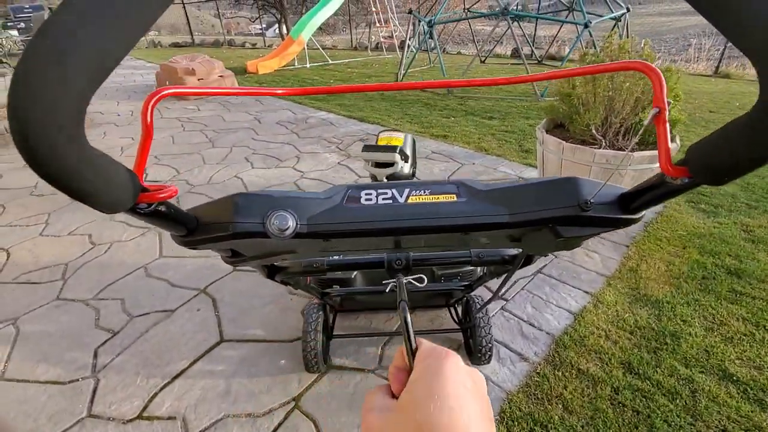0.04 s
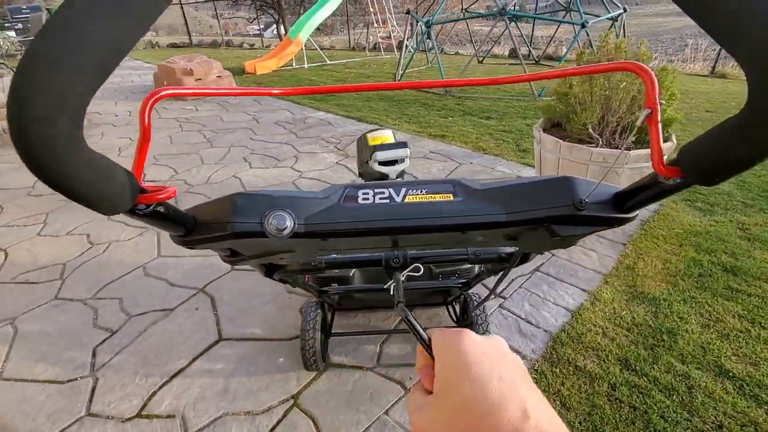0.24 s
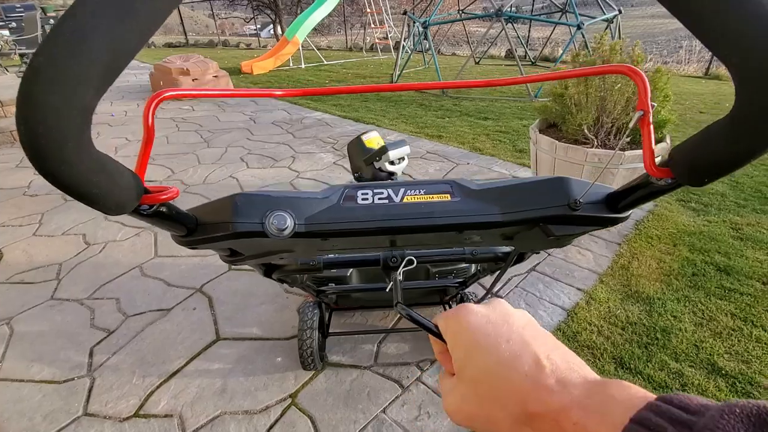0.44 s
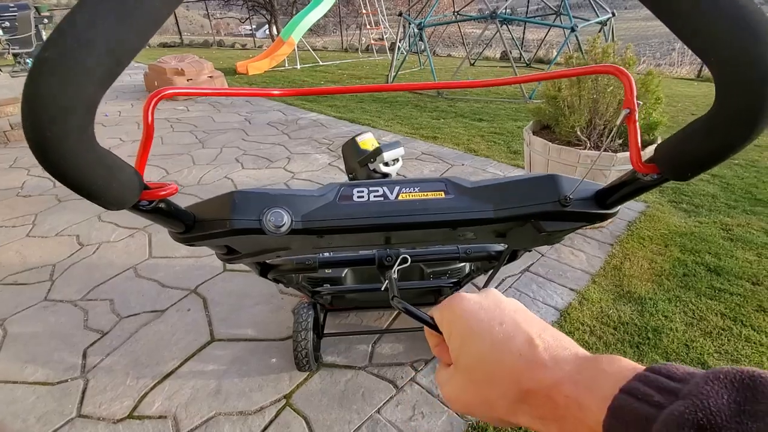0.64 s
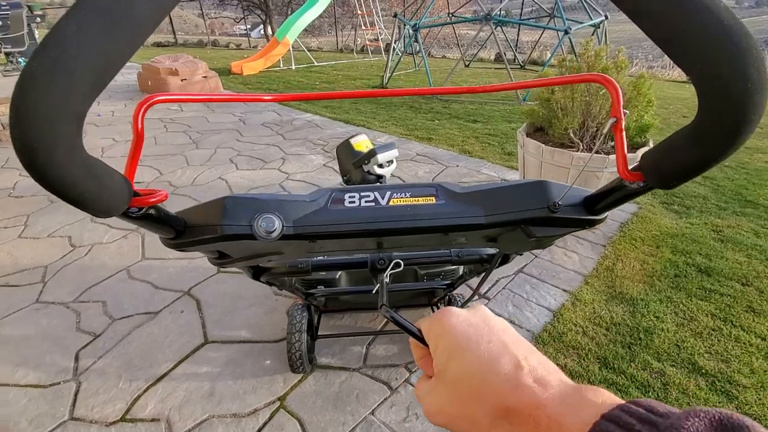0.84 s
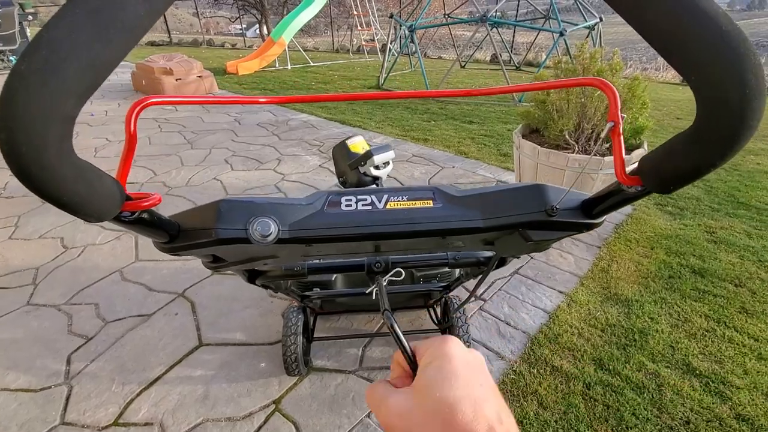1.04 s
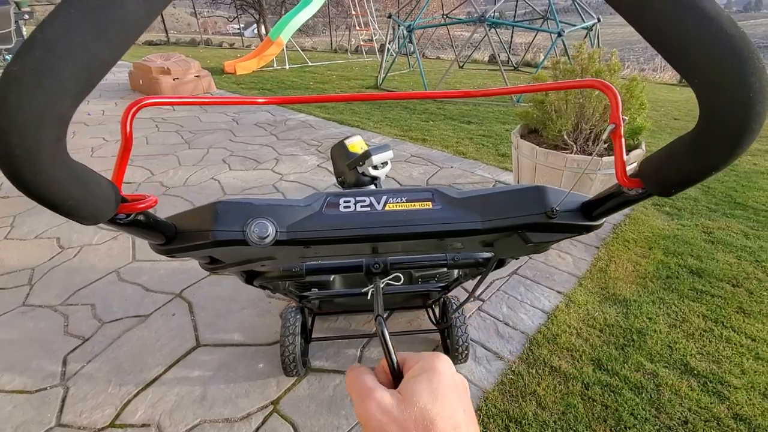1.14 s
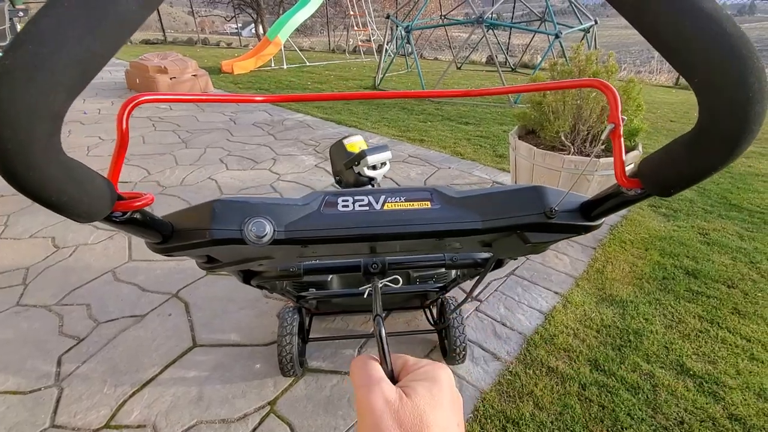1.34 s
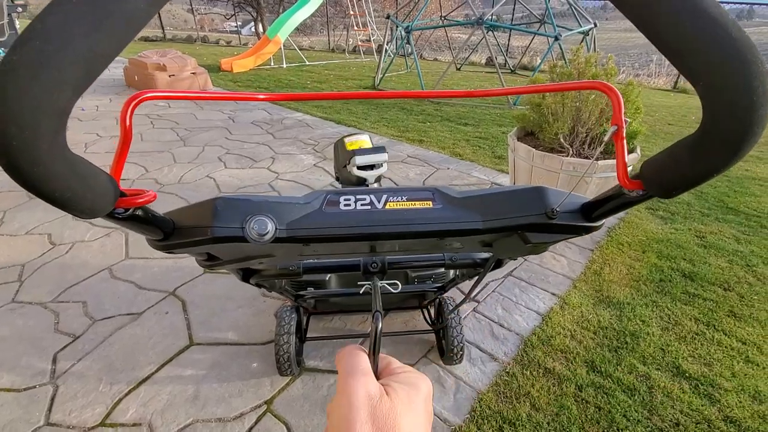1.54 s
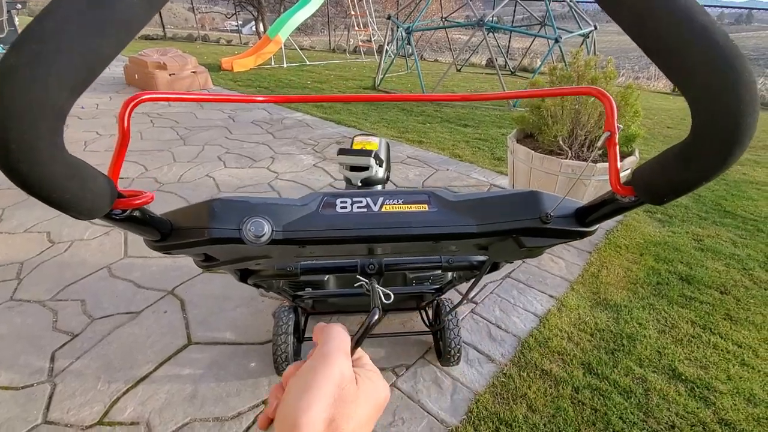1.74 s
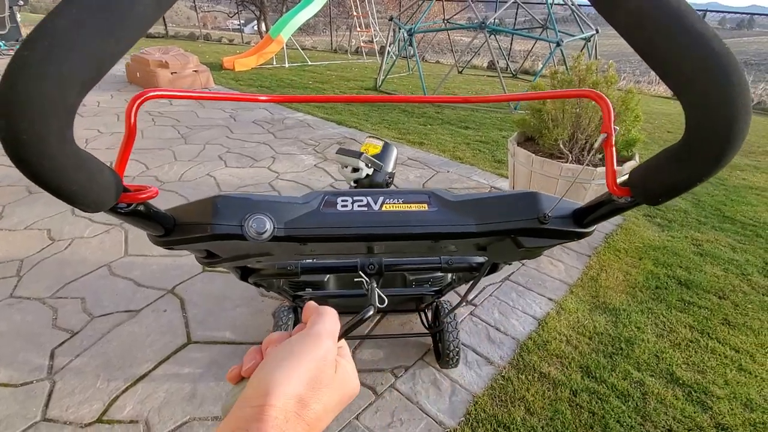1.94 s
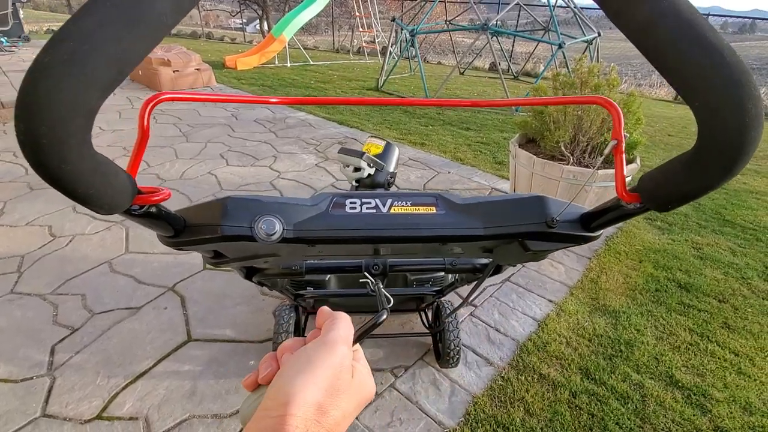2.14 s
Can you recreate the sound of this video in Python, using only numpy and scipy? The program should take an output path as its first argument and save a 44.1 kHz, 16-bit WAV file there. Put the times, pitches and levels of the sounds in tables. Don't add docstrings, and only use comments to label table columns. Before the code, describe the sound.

A snowblower chute crank turns close by, slightly left. Faint creaks and a light touch open; hard, hollow metal clunks with rasping gear teeth hit at 0.2-0.27 and 0.4-0.46 s. Soft, dull knocks follow, growing from 0.86 to 1.3 s. After a lull, rattling clunks and scrapes cluster at 1.52-1.87 s, then fade. Short patio echoes, low wind, faint insect hiss, a barely audible far bird after 2.05 s.

```python
import sys
import numpy as np
from scipy import signal
from scipy.fft import rfft, irfft
from scipy.io import wavfile
from scipy.ndimage import uniform_filter1d

SR = 44100
rng = np.random.default_rng(int(sys.argv[2]) if len(sys.argv) > 2 else 0)


def volts(x):
    e = np.asarray(x, float) / 20
    return 10 ** e


def persist_wave(psi):
    counts = np.round(np.clip(psi, -1, 1) * 32767).astype(np.int16)
    wavfile.write(sys.argv[1], SR, np.atleast_2d(counts).T)


N = 97020


def evened(x):
    return x / np.sqrt(np.mean(x ** 2) + 1e-20)


def read(points, hz):
    table_hz, value = np.transpose(points)
    return np.interp(np.log(hz + 1), np.log(table_hz + 1), value)


def add(mix, start_s, sound):
    at = round(start_s * SR)
    sound = sound[max(-at, 0):]
    part = mix[max(at, 0):][:len(sound)]
    part += sound[:len(part)]


def colour(x, gain):
    hz = np.fft.rfftfreq(x.shape[-1], 1 / SR)
    return irfft(rfft(x) * gain(hz), x.shape[-1])


def resonate(x, hz, width_hz):
    turn = np.exp(2j * np.pi * hz * np.arange(len(x)) / SR)
    r = np.exp(-np.pi * width_hz / SR)
    return 2 * (turn * signal.lfilter([1 - r], [1, -r], x / turn)).real


def impacts(size, per_s, spread_db):
    chance, rarity, sign = rng.random((3, size))
    strength = volts(spread_db * np.minimum(-np.log(rarity + 1e-9), 4))
    return (chance < per_s / SR) * np.sign(sign - .5) * strength


def pair(a, b, same):
    def likeness(f):
        return np.clip(read(same, f), 0, 1)
    right = colour(a, likeness) + colour(b, lambda f: np.sqrt(1 - likeness(f) ** 2))
    return np.array([a, right])


def wind():
    # hz, level_db
    wind_spectrum = [(12, -72), (20, -30), (92, -7), (134, -20), (170, -15), (189, -26), (228, -21),
                     (344, -37.5), (600, -39.5), (1200, -64.5), (1560, -90), (2640, -120)]
    # hz, likeness (0-1)
    wind_same = [(100, 0.98), (500, 0.86), (2000, 0.44), (8000, 0.16)]
    a, b, slow = rng.standard_normal((3, N))
    lump = volts(0.87 * evened(uniform_filter1d(uniform_filter1d(slow, 800), 800)))
    low = colour(pair(a, b, wind_same), lambda f: volts(read(wind_spectrum, f)))
    return volts(-47.5) * evened(low * lump)


def far_hiss():
    # hz, level_db
    hiss_spectrum = [(350, -41.5), (600, -14.5), (2960, -19.5), (4280, -25), (6540, -22), (10000, -23.5),
                     (15700, -18)]
    noise = rng.standard_normal((2, N))
    return volts(-72) * evened(colour(noise, lambda f: volts(read(hiss_spectrum, f))))


def insects():
    # pitch_hz, width_hz, level_db, start_s
    insect_bands = [
        (6670, 880, -81, 0),
        (11000, 900, -94, 1.29),
        (15100, 900, -88, 1.05),
    ]
    noise = rng.standard_normal((2, N))
    t = np.arange(N) / SR
    total = 0
    for hz, width_hz, level_db, start_s in insect_bands:
        band = colour(noise, lambda f: 1 / (1 + (2 * (f - hz) / width_hz) ** 4))
        total = total + volts(level_db) * np.clip((t - start_s) / 0.024, 0, 1) * evened(band)
    return total


def ring(modes, t):
    hz, db, t60_s = np.transpose(modes)[:, :, None]
    mix, off = rng.standard_normal((2, len(modes), 1))
    spread_db, detune = 2.5, .015
    decay = volts(db + spread_db * mix - 60 * t / t60_s)
    x = (decay * np.sin(2 * np.pi * hz * (1 + detune * off) * t)).sum(0)
    return x / np.linalg.norm(x)


def burst(spectrum, t, t60_s, top_t60_s):
    x = colour(rng.standard_normal(len(t)), lambda f: volts(read(spectrum, f)))
    low = colour(x, lambda f: 1 / (1 + (f / 2000) ** 2))
    x = low * volts(-60 * t / t60_s) + (x - low) * volts(-60 * t / top_t60_s)
    return x / np.linalg.norm(x)


def machine_response(thud_db, tick_db):
    # pitch_hz, level_db, t60_s
    housing = [(189.2, -1, 0.13), (218, -1, 0.17), (253.2, 7, 0.069), (292.2, -3.5, 0.14),
               (380, -9.5, 0.11), (435.6, -6, 0.11)]
    # pitch_hz, level_db, t60_s
    chute = [(560, -18, 0.085), (625.1, 7.5, 0.11), (692.7, 7, 0.13), (890, -23.5, .07), (1063, -6.5, 0.26),
             (1150, 5.5, 0.13), (1317, -2, .08), (1356, 1, 0.068), (1380, -13, 0.053), (2050, -16, 0.023),
             (2377, -1.5, 0.053), (2760, -16, 0.023), (2940, -3.5, 0.11), (3210, -2, 0.089)]
    # hz, level_db
    clatter = [(240, -18.5), (400, 2.5), (500, 0.5), (947, -5), (1460, -8), (2300, -9), (7000, -24),
               (9100, -48.5), (15400, -90)]
    # hz, level_db
    fizz = [(2940, -13), (5000, -8.5), (7400, -12), (7990, -8.5), (13900, -9.5), (15700, -11.5)]
    t = np.arange(12000) / SR
    thud = volts(5 + thud_db) * ring(housing, t) * (1 - np.exp(-t / 0.006))
    paths = []
    for _ in "LR":
        path = thud + volts(-7.5) * ring(chute, t)
        path = path + volts(-2.5) * burst(clatter, t, 0.12, 0.094)
        path = path + volts(1 + tick_db) * burst(fizz, t, 0.045, 0.045)
        paths.append(path)
    return np.array(paths)


def slides(crank):
    # start_s, length_s, level_db, thud_db, fizz_db
    slide_events = [(-.04, 0.06, -36.5, 4, -14.5), (0.019, 0.078, -45, -9.5, -12), (0.051, .1, -50, 1, -8),
                    (0.269, 0.12, -55, -2, -12.5), (0.868, 0.18, -63, 19, -21), (0.963, 0.14, -61, 18, -31),
                    (0.172, 0.051, -20.5, -5, -16), (0.231, 0.04, -31.5, -4.5, -14.5),
                    (0.399, .07, -19, -9, -26), (1.073, 0.052, -53.5, 13.5, -13.5),
                    (1.109, 0.053, -39.5, 14.5, -15), (1.217, .05, -32.5, 3.5, -27),
                    (1.526, 0.04, -26.5, -2.5, -13), (1.59, 0.063, -30.5, -2.5, -12.5),
                    (1.62, 0.069, -22, -4, -21.5), (1.693, 0.065, -31, 7.5, -24),
                    (1.729, 0.038, -30, -4, -11.5), (1.799, 0.11, -38.5, 10.5, -16.5),
                    (1.812, .065, -21.5, -2, -12), (1.927, .02, -48.5, 13, -10)]
    for start_s, length_s, level_db, thud_db, fizz_db in slide_events:
        slips = evened(impacts(6000, per_s=3500, spread_db=4))
        progress = np.arange(len(slips)) / SR / length_s
        load = np.interp(progress, [0, .06, .7, 1], [0, .2, 1, 0]) ** 1.4
        response = machine_response(thud_db, fizz_db)
        sound = signal.fftconvolve((slips * load)[None], response, axes=1)
        add(crank, start_s, volts(level_db) * sound.T)


def puff(hz, width_hz, t60_s):
    t = np.arange(4000) / SR
    x = rng.standard_normal((2, len(t)))
    for _ in range(3):
        x = np.array([resonate(path, hz, width_hz) for path in x])
    return evened(x) * volts(-60 * t / t60_s) * np.minimum(t / .0006, 1)


def knock(level_db, thud_db, tick_db, snap_db, contact_ms=.06, rattle_s=0.008):
    t = np.arange(3000) / SR
    blows = 0.35 * impacts(len(t), per_s=2500, spread_db=4) * np.exp(-t / rattle_s)
    blows[0] = 1
    dulling = signal.butter(2, 1000 / contact_ms, fs=SR)
    blows = signal.lfilter(*dulling, blows / np.linalg.norm(blows))
    response = machine_response(thud_db, tick_db)
    sound = volts(level_db + 26) * signal.fftconvolve(blows[None], response, axes=1).T
    add(sound, 0, volts(level_db + snap_db) * puff(hz=1247, width_hz=1180, t60_s=0.04).T)
    return sound


def touches(crank):
    # start_s, level_db, thud_db, contact_ms, rattle_s
    touch_events = [(.002, -29, 3.5, 0.81, 0.012), (.016, -45.5, 14.5, 0.69, 0.0093),
                    (.085, -50.5, 20, 1.1, 0.028), (.31, -47.5, 13.5, 0.39, .01),
                    (.378, -37, 3, 0.61, .005), (.51, -40, 9, 0.42, .01), (.615, -52.5, 4, .7, 0.0088),
                    (.859, -38, 7.5, 1.5, .004), (.9084, -46, 7.5, 1.03, .004), (0.958, -37, 4, 1.1, .006),
                    (1.001, -47.5, 8, 1.3, .006), (1.017, -35, 1, 0.69, 0.0046),
                    (1.084, -42, -2, 1.1, .005), (1.097, -33.5, 2, 1.4, 0.018),
                    (1.194, -32, 1.5, 1.07, 0.0092), (1.263, -27, -1.5, 1.3, 0.011),
                    (1.289, -36, -3, 1.6, .007), (1.431, -59.5, 7, 0.9, 0.007),
                    (1.6009, -25, -3, 0.16, .008), (1.712, -25, -0.5, 0.67, 0.0067),
                    (1.9, -36, 7, 0.7, 0.0067), (2.102, -44.5, 4.5, 1.5, 0.0039)]
    for start_s, level_db, thud_db, contact_ms, rattle_s in touch_events:
        add(crank, start_s, knock(level_db, thud_db, -23, -32.5, contact_ms, rattle_s))


def rasps(crank):
    # start_s, length_s, level_db, swell (0-1)
    rasp_events = [(.056, .095, -66.5, .2), (0.18, 0.069, -46.5, .7), (.242, 0.038, -50, .1),
                   (0.4, 0.088, -48.5, 0.3), (0.494, 0.014, -56.5, .2), (1.075, .05, -74, 0.6),
                   (1.128, .03, -53.5, 0.2), (1.238, .032, -51.5, 0), (1.525, 0.055, -52.5, .4),
                   (1.6, .012, -50, .1), (1.62, .035, -42, 0), (1.655, 0.039, -47.5, .1),
                   (1.734, .04, -42, .2), (1.796, .012, -55, .1), (1.829, .055, -48.5, .5),
                   (1.931, .01, -58, .1)]
    # hz, level_db
    grit_spectrum = [(1000, -22), (2500, -2.5), (5000, -8), (8000, -10), (11000, -9), (13500, -5),
                     (15700, -8.5)]
    t = np.arange(6000) / SR
    for start_s, length_s, level_db, swell in rasp_events:
        grit = np.array([impacts(len(t), per_s=6000, spread_db=4.5) for _ in "LR"])
        grit = evened(colour(grit, lambda f: volts(read(grit_spectrum, f))))
        load = 1 - swell * np.clip(1 - t / length_s, 0, 1)
        load = load * np.minimum(t / 0.0022, 1)
        fade = np.exp(-np.maximum(t - length_s, 0) / 0.0046)
        add(crank, start_s, (volts(level_db) * grit * load * fade).T)


def clunks(crank):
    # start_s, level_db, thud_db, tick_db, snap_db
    clunk_events = [(.195, -19, -36.5, -23.5, -21), (0.209, -16, -13, -17.5, -3),
                    (.217, -17.5, -3.5, -33.5, 1), (0.2418, -13, -4, -22, 0.5), (.262, -28, 1.5, -37.5, 2),
                    (0.4365, -22, 1, -22.5, 5), (.454, -16, -2.5, -23, 2), (1.135, -34.5, 3.5, -16, -16),
                    (1.214, -30, 1, -21, 11.5), (1.555, -26.5, 3.5, -26.5, -18),
                    (1.6395, -22.5, -15.5, -29.5, -2), (1.657, -16, -1.5, -21.5, -6.5),
                    (1.76, -19, -1, -25, -11), (1.8004, -23.5, -0.5, -20, -22),
                    (1.84, -21, -2.5, -33, -9.5), (1.8564, -15, -12.5, -33.5, 3.5)]
    for start_s, *levels_db in clunk_events:
        add(crank, start_s, knock(*levels_db))


def glints(crank):
    # start_s, level_db, pitch_hz, width_hz, t60_s
    glint_events = [(0.215, -18, 1357, 204, 0.096), (.242, -17, 3500, 2500, 0.018),
                    (.489, -42, 4630, 5000, .02), (.645, -51, 13240, 3215, 0.044),
                    (.647, -63.5, 6970, 6000, 0.044), (0.649, -62, 2840, 1500, 0.064),
                    (.745, -72, 2520, 1500, .02), (.8, -74, 2500, 1500, 0.018),
                    (.86, -63.5, 7200, 7000, 0.033), (.861, -32.5, 245, 148, .14),
                    (.961, -49, 960, 360, 0.023), (0.97, -62.5, 3080, 2000, .06),
                    (1.028, -42, 310, 118, .1), (1.075, -57, 3500, 2200, 0.073),
                    (1.216, -27, 1950, 2000, 0.084), (1.29, -22, 214, 140, 0.092),
                    (1.554, -22, 784, 600, .12), (1.638, -20.5, 1400, 300, 0.052),
                    (1.8, -17, 650, 242, 0.0914), (1.857, -16.5, 2460, 2200, 0.018),
                    (2.034, -62, 8100, 1500, .029), (2.035, -69, 2230, 1190, .034)]
    for start_s, level_db, pitch_hz, width_hz, t60_s in glint_events:
        add(crank, start_s, volts(level_db) * puff(pitch_hz, width_hz, t60_s).T)


def near_field(crank):
    # hz, likeness (0-1)
    crank_same = [(100, 0.96), (500, 1), (1400, 0.49), (2800, 0.56), (6000, 0.11), (12000, 0.1)]
    # hz, level_db
    left_over_right = [(100, 0.3), (350, .8), (1400, 3.1), (5600, 1.5), (13000, 5.5)]
    late_s = 3.5e-5

    def port(x, share):
        return colour(x, lambda f: volts(share * read(left_over_right, f))
                      * np.exp(2j * np.pi * f * share * late_s))
    left, right = pair(*crank, crank_same)
    return np.array([port(left, .5), port(right, -.5)])


def patio(x):
    t = np.arange(15000) / SR
    taps = rng.standard_normal((2, len(t))) * volts(-60 * t / 0.2)
    echoes = signal.fftconvolve(x[None], taps / np.linalg.norm(taps[0]), axes=1)[:, :N]
    return volts(-17.5) * colour(echoes, lambda f: volts(0.5) + 1 / (1 + (f / 3500) ** 2))


def bird():
    start_s, pitch_hz, width_hz = 2.045, 2600, 130
    call = rng.standard_normal(N)
    for _ in range(2):
        call = resonate(call, pitch_hz, width_hz)
    on = np.clip((np.arange(N) / SR - start_s) / 0.014, 0, 1)
    return volts(-79) * on * evened(call)


def scene():
    crank = np.zeros((N, 2))
    slides(crank)
    touches(crank)
    rasps(crank)
    clunks(crank)
    glints(crank)
    crank = colour(crank.T, lambda f: 1 / np.sqrt(1 + (110 / (f + 1)) ** 8))
    surroundings = wind() + far_hiss() + insects() + bird()
    return near_field(crank) + patio(crank[0]) + surroundings


def low_pass(x):
    return signal.sosfilt(signal.butter(12, 15820, fs=SR, output="sos"), x)


def record(dry):
    mix = colour(dry, lambda f: f < 15950)
    return low_pass(mix)


dry = scene()
out = record(dry)
persist_wave(out)
```